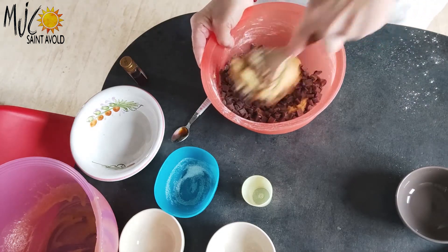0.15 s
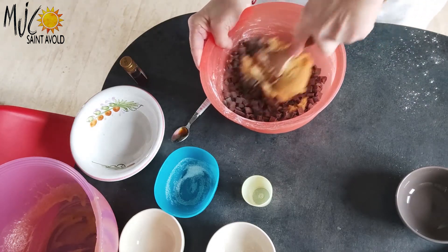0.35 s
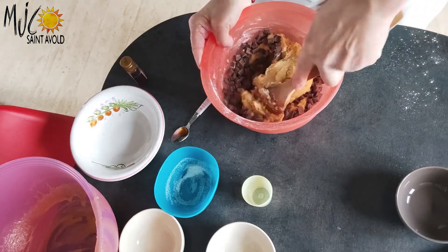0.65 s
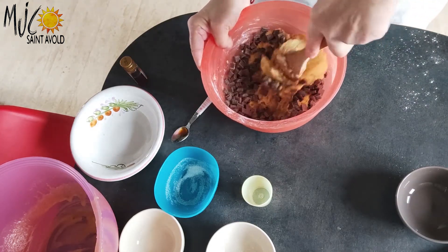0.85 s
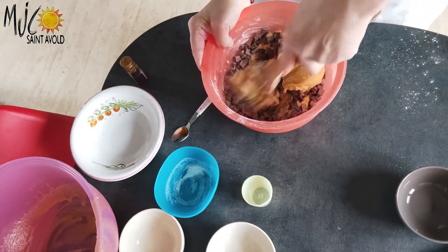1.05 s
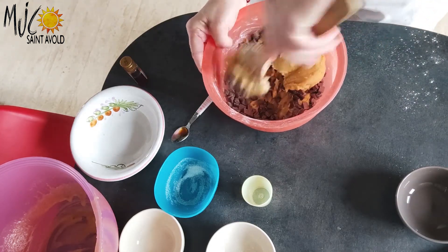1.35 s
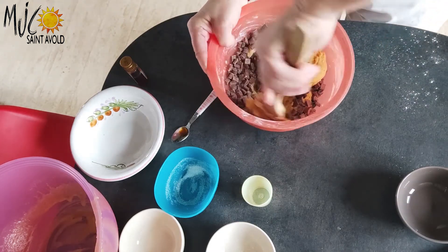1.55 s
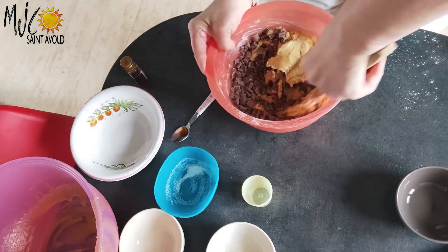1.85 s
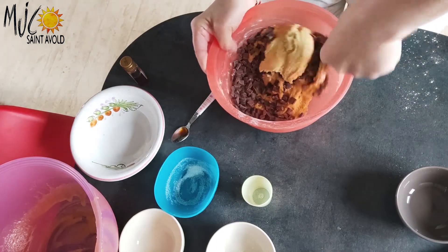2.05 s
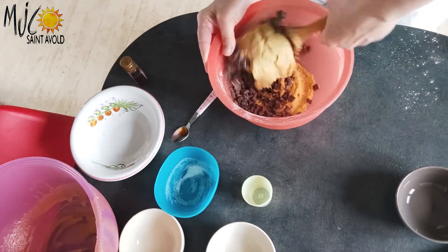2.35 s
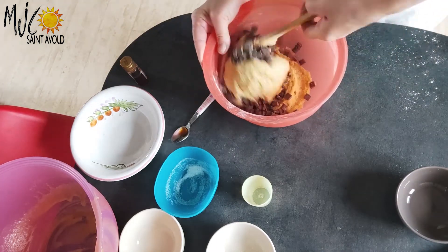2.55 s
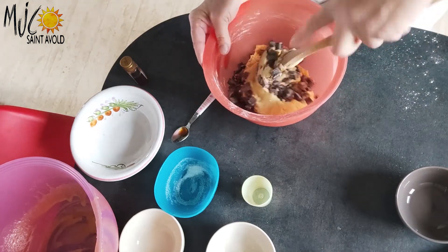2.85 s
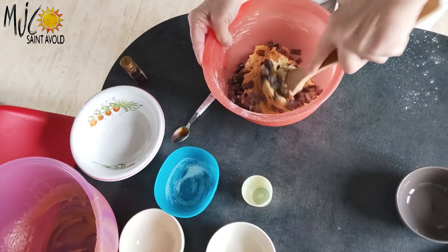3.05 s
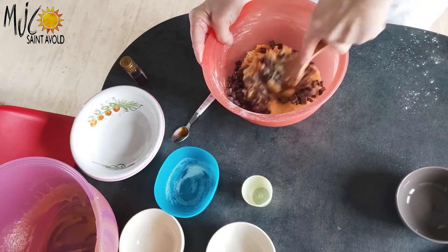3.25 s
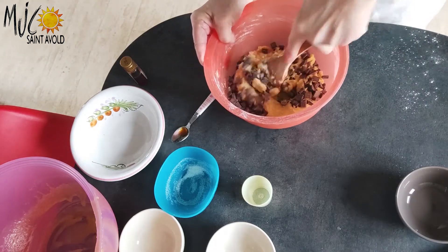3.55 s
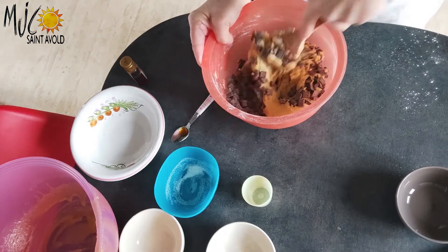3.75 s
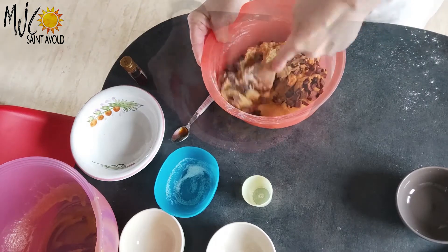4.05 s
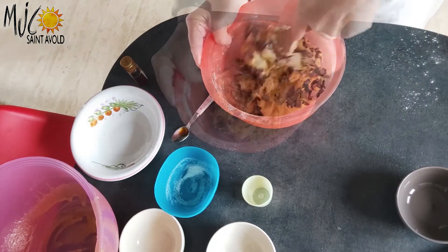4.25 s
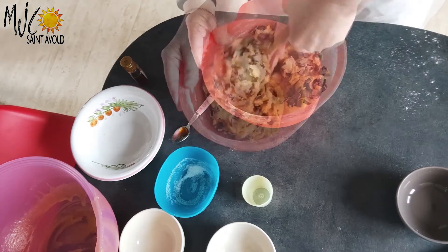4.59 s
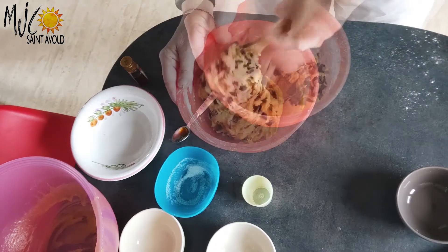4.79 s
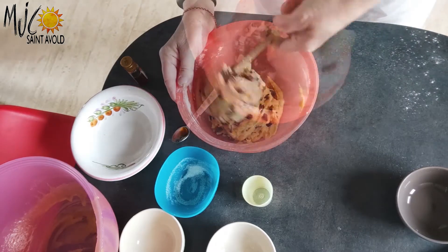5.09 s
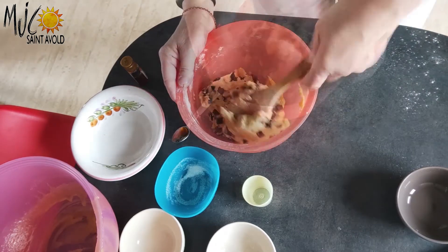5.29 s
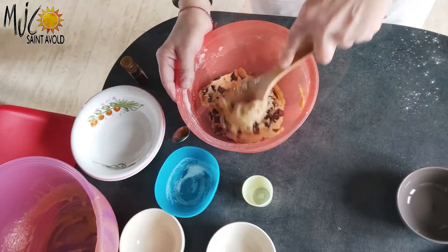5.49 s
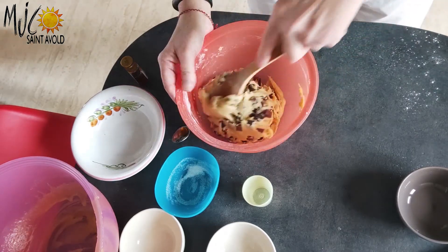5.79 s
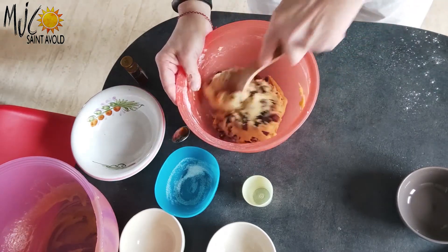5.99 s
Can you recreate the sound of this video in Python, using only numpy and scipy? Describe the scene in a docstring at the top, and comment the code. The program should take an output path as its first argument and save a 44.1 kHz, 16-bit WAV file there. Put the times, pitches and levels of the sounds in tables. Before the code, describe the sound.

A wooden spoon folds chocolate chips into thick dough in a plastic bowl, snapping, crunching and bumping, then abruptly turning to soft stirring.

```python
"""A small kitchen: a wooden spoon folds chocolate chips into thick dough in a hand-held plastic bowl.
Chips snap against the wall (noise bursts into short resonances), clumps crunch and wood judders on plastic;
the sticky mass grinds and smears (grains of noise) and the bowl bumps on the table (ringing modes).
After an abrupt edit the chips are bound in the dough and the stirring is soft.
Room echoes, still air and a low mains hum surround it, heard by two small microphones."""
import sys
import numpy as np
from scipy import signal
from scipy.fft import rfft, irfft
from scipy.io import wavfile

SR = 44100
rng = np.random.default_rng(int(sys.argv[2]) if len(sys.argv) > 2 else 0)


def file_out(sig):
    """Save sig as 16-bit WAV at sys.argv[1]."""
    # one column per channel
    cols = np.atleast_2d(sig).T
    # limit, then scale
    lim = np.clip(cols, -1, 1)
    pcm = np.round(lim * 32767).astype(np.int16)
    wavfile.write(sys.argv[1], SR, pcm)


N = 270288
TIME = np.arange(N) / SR

# Event levels are cue levels: each layer is trimmed again by the gains in scene().
# The loudest chips snapping on the wall, the pitch being that spot of the wall:
# (time [s], wall ring level [dB], bright crack level [dB], wall pitch [Hz])
SNAPS = [(0.0064, -27, -30, 2220), (0.057, -24.5, -23.5, 2650), (0.141, -29, -36.5, 2430),
         (0.203, -24.5, -30.5, 2250), (0.2994, -33.5, -29.5, 2180), (0.395, -37, -29, 2800),
         (0.4007, -24.5, -34, 3120), (0.43, -44, -28, 2200), (0.4751, -32, -24, 2480),
         (.496, -31.5, -24.5, 2170), (0.555, -33, -65, 2880), (0.6837, -18.5, -26.5, 2270),
         (0.7031, -26.5, -23.5, 2750), (0.8593, -42, -33, 2410), (1.1195, -35, -27.5, 2890),
         (1.126, -28, -19, 2870), (1.1366, -43, -20.5, 2840), (1.481, -22, -27.5, 2500),
         (1.4859, -40, -20, 2610), (1.691, -29, -35, 2640), (2.3097, -31, -56, 2480),
         (2.348, -32, -50.5, 2200), (2.3626, -25, -50, 2730), (2.405, -30.5, -27.5, 2060),
         (2.458, -23.5, -40, 2740), (2.505, -24.5, -51, 2400), (2.512, -27, -42, 2700),
         (2.5345, -28, -28, 2240), (2.5737, -17, -23.5, 2100), (2.6196, -37, -27, 2300),
         (2.633, -23, -26, 2350), (2.7039, -23, -27, 2420), (2.7235, -26.5, -31, 2550),
         (2.765, -25.5, -21.5, 2670), (2.9214, -21, -23, 2510), (2.9342, -30, -41.5, 2800),
         (2.9864, -25.5, -35, 2490), (3.004, -26, -30.5, 2450), (3.034, -27, -53, 2350),
         (3.089, -25.5, -61, 2470), (3.149, -30, -34.5, 2760), (3.175, -29, -39, 2410),
         (3.2201, -30, -30.5, 2510), (3.3517, -34, -49, 2140), (3.475, -23.5, -26, 2180),
         (3.817, -35, -42, 3060), (3.9924, -21, -38, 2220), (4.011, -32, -27, 2520),
         (4.0503, -34, -28.5, 2390), (4.233, -24, -30.5, 2150), (4.358, -29, -58, 2690),
         (4.4404, -25.5, -33.5, 1940), (4.476, -24.5, -16.5, 2760), (4.504, -27, -37, 2480),
         (4.5214, -28, -32, 2680), (4.549, -25, -34, 1930), (4.581, -30.5, -37, 2450),
         (4.455, -35, -48, 2100), (4.633, -23, -30, 2700), (4.6924, -28, -24.5, 2220),
         (4.7151, -24, -30.5, 2760), (4.868, -62, -38.5, 3430), (5.72, -69, -50.5, 3400)]
# A clump of chips and crumbs gives way under the spoon: (time [s], level [dB], fall to 1/e [s])
CRUNCHES = [(.008, -48, 0.08), (.194, -40.5, .012), (.402, -46, 0.026), (0.684, -34, 0.021),
            (1.125, -31.5, 0.015), (1.4838, -30.5, 0.0074), (2.4051, -41, 0.023), (2.449, -46.5, 0.022),
            (2.919, -48, 0.016), (3.74, -39.5, 0.016), (3.991, -27.5, 0.011), (4.054, -38, 0.02),
            (4.225, -35.5, 0.016), (4.469, -33.5, 0.03)]
# The spoon judders along the wall, which sings at the pitch of that spot:
# (time [s], level [dB], wall pitch [Hz], length [s])
JUDDERS = [(0.008, -34, 2440, 0.019), (0.406, -40, 2380, 0.064), (1.69, -42.5, 2830, 0.029),
           (1.768, -41, 2430, 0.031), (1.84, -39, 2530, 0.029), (1.901, -42, 1320, 0.0091),
           (1.932, -43.5, 1420, 0.053), (2.043, -44, 1350, 0.03), (2.356, -36, 2360, 0.027),
           (2.464, -34, 2500, 0.019), (2.934, -40, 2740, 0.023), (2.992, -29.5, 2290, 0.04),
           (3.088, -42, 2420, 0.022), (3.261, -38.5, 2320, 0.011), (4.634, -39.5, 2720, .015)]
# The bowl bumping on the table, edge and hollow ring relative to the thud:
# (time [s], thud level [dB], hard edge [dB], hollow ring [dB], contact swell [s])
BUMPS = [(0.284, -39.5, -12, 4, 0.026), (0.329, -40.5, -37, 7.5, 0.0077), (0.702, -38.5, -34, 5.5, 0.01),
         (1.129, -45.5, -3.5, 5.5, 0.015), (1.483, -49, -2, -8.5, 0.0054), (1.949, -48, -15, 5.5, 0.011),
         (2.435, -41, -30, 5, 0.0064), (3.4267, -24, -13, 6.5, 0.00438), (3.599, -45, -8, 0, 0.016),
         (3.848, -41.5, -19, 2, 0.015), (4.056, -46.5, -18, 7.5, 0.023), (4.3408, -30.5, -19, 7.5, 0.005),
         (4.478, -44.5, 12, -10, 0.0013), (4.53, -43, -10, 4, 0.0089), (4.797, -47, -30, 5, 0.013),
         (5.848, -51.5, -31, 0, 0.002)]
# Pushes of the spoon, length counted from the start to where the push begins to relax:
# (start [s], rise [s], length [s], load on the bowl [dB], chips grinding [dB], sticky smear [dB])
PUSHES = [(-0.03, 0.026, 0.028, -40.5, -32.5, -28.5), (0.248, 0.025, 0.13, -52, -47, -39),
          (0.388, 0.05, 0.093, -48.5, -43, -39), (0.575, 0.024, 0.038, -51, -74, -40.5),
          (0.67, 0.019, 0.22, -49, -52.5, -46), (1.078, 0.0083, 0.21, -62, -52, -53.5),
          (1.276, 0.019, 0.27, -79, -90, -47.5), (1.502, 0.022, 0.2, -60, -50, -43),
          (1.628, 0.031, 0.19, -49.5, -44, -42), (1.853, 0.063, 0.31, -56.5, -49.5, -41),
          (2.139, 0.22, 0.36, -52.5, -46, -38.5), (2.65, 0.024, 0.18, -53, -56.5, -42.5),
          (2.944, 0.095, 0.15, -49, -53, -58), (3.116, 0.031, 0.32, -57, -54.5, -52),
          (3.502, 0.075, 0.079, -52, -40.5, -37.5), (3.69, 0.015, 0.14, -56.5, -60.5, -48.5),
          (3.968, 0.024, 0.29, -47.5, -47.5, -37), (4.452, 0.036, 0.16, -49, -45, -36.5),
          (4.704, 0.0045, 0.025, -45.5, -61, -53), (4.738, 0.04, 0.058, -54.5, -64.5, -60),
          (4.94, 0.024, 0.018, -61, -62.5, -38), (5.182, 0.093, 0.15, -66, -62, -43),
          (5.377, 0.02, 0.038, -61, -64, -47), (5.439, 0.013, 0.02, -70, -72, -44.5),
          (5.864, 0.1, 0.1, -58.5, -61.5, -54), (6.013, 0.044, .13, -64.5, -72, -48.5)]
# The spoon gliding on under the pushes, with loose and with bound chips:
# (load [dB], grinding [dB], smear [dB])
GLIDE_LOOSE, GLIDE_BOUND = (-61.5, -69, -55), (-76.5, -92, -59)

# Ringing modes of bowl and table: (frequency [Hz], level [dB], 60 dB decay [s])
BOWL_MODES = [(71, -15, .2), (120, -21, .13), (163, -12, .12), (210, -4, .075), (232, 1.5, .115),
              (323, -3, .1), (361, -2, .105), (415, -3.5, .07), (450, -3.5, .08), (482, -5, .08),
              (632, 1.5, .06), (664, -1, .05), (790, -2.5, .05), (964, -13, .04)]
# Spectra, each a shape whose overall level is normalised: (frequency [Hz], density [dB per Hz])
WALL = [(150, -40), (600, -16), (1100, 2.5), (1500, -10.5), (2000, 1.5), (2450, 4.5), (3000, -2.5),
        (4000, -4), (8000, -17.5)]  # plastic wall when knocked
CRACK = [(200, -6), (1000, -3), (2500, -3.5), (4000, 3.5), (6000, 5.5), (9000, 4.5), (11000, 11),
         (16000, -12)]  # bright snap of a chip
CRUMBS = [(200, -6.5), (1000, 8), (1600, 6), (2400, 10.5), (4000, -0.5), (9000, -11), (11000, 2.5),
          (16000, -12)]  # breaking crumbs
GRIND = [(150, -20.5), (500, -6), (1000, -7), (1500, -8.5), (2300, -2.5), (2900, -2), (4000, -8.5),
         (6000, -7), (12000, -28.5)]  # rasp of chips grinding
SMEAR = [(300, -8.5), (1500, -37), (3500, -11.5), (6000, -6.5), (9000, -1), (12000, 7.5), (16000, -0.5)]  # sticky dough tearing
THUD = [(40, -7), (90, -12), (200, 4), (350, 4), (550, 6), (750, 8), (1000, -7.5), (2000, -20), (6000, -72)]  # thud of the bowl, also the heave of the mass
EDGE = [(100, -22), (600, -0.5), (1000, 4), (1300, 5.5), (1700, -7.5), (3500, -23), (9000, -29)]  # woody edge of a bump
CUSHION = [(100, 1), (230, -1.5), (400, -13.5), (800, -4), (1500, -1)]  # the dough softens the spoon's push on the bowl
AIR = [(20, -9), (70, 10), (120, 5), (220, 7), (450, 1.5), (800, -2.5), (1600, -14), (4000, -16.5),
       (8000, -49), (16000, -6)]  # still room air
# Small microphones, each with the resonance of its port: (frequency [Hz], gain [dB])
LEFT_MIC = [(100, -1.5), (800, -5), (1500, -0.5), (4000, -0.5), (6800, 0), (7700, 7), (8500, 9.5),
            (9200, 5), (9900, -22), (11000, -23), (16000, -28.5)]
RIGHT_MIC = [(100, -7), (800, -9), (1500, -1), (4000, 0.5), (6200, 4.5), (7300, 16), (8100, 6.5),
             (9200, -5), (9900, -10.5), (11000, -27.5), (16000, -18)]
# The kitchen's reverberation: (frequency [Hz], 60 dB decay [s], left-right likeness [0 to 1])
ROOM = [(100, 0.45, 0.98), (393, 0.4, 0.9), (1030, 0.77, 0.05), (2430, 0.51, 0.18), (6600, 0.44, 0),
        (15400, 0.044, 0)]

EDIT_S = 4.733
EDIT_DUCK_DB = -16.5  # echoes still ringing at the edit drop by this much
STIRS_PER_S = 2.5  # the echoes circle with the spoon
PUSH_T60_S = 0.26  # the dough relaxes by 60 dB
REBOUND_S, REBOUND_LOSS_DB = 0.01, 14  # a snapped chip strikes again, its delay scattered around this
TICK_RANGE_DB = 19  # from the strongest to the weakest flick of a loose chip
SLIP_S, SLIP_SPREAD_DB = 0.0069, 4.5  # mean wait between a judder's slips, uneven strength
RING_WIDTH_HZ = 320  # bandwidth of one resonance of the wall
AIR_DB, HUM_DB, HUM_HZ = -60, -63.5, 49.5  # levels ahead of the microphones
CUTOFF_HZ = 15600


def from_db(db):
    """Decibels to gain."""
    return 10 ** (np.asarray(db) / 20)


def rms_one(x):
    """Scale to rms 1."""
    return x / np.sqrt(np.mean(x ** 2) + 1e-20)


def at_hz(points, hz, axis=1):
    """Read one column of a table on a log-frequency axis."""
    points = np.array(points)
    return np.interp(np.log(np.maximum(hz, 1)), np.log(points[:, 0]), points[:, axis])


def coloured(x, spectrum, keep_power=True):
    """Causal (minimum-phase) filter with the given spectrum, made by folding its cepstrum."""
    size = 4096
    cepstrum = irfft(np.log(from_db(at_hz(spectrum, np.fft.rfftfreq(size, 1 / SR)))))
    cepstrum[1:size // 2] *= 2
    cepstrum[size // 2 + 1:] = 0
    response = irfft(np.exp(rfft(cepstrum)))
    if keep_power:
        response = response / np.linalg.norm(response)
    return signal.fftconvolve(x, response)[:N]


def drift(rate_hz):
    """Slow random wander with spread 1: noise through two equal low-passes."""
    r = np.exp(-2 * np.pi * rate_hz / SR)
    noise = rng.standard_normal(N + SR)
    settled = signal.lfilter([1], [1, -2 * r, r * r], noise)[SR:]
    return rms_one(settled)


def contacts(times, levels_db, lengths):
    """Each contact is a rough burst of force, even across pitch, that swells for its length and dies away."""
    out = np.zeros(N)
    t = TIME[:8192]
    grits = rng.standard_normal((len(times), len(t)))
    for s, db, length, grit in zip(times, levels_db, lengths, grits):
        age = t / max(length, 1e-4)
        swell = age * np.exp(1 - age)
        # keep only the phases, so that every pitch is equally strong
        even = irfft(np.exp(1j * np.angle(rfft(grit * swell))))
        burst = even * np.minimum(4 * swell, 1)
        gain = from_db(db) * np.linalg.norm(swell) / np.linalg.norm(burst)
        at = max(round(s * SR), 0)
        out[at:at + len(t)] += gain * burst[:N - at]
    return out


def grains(per_s, spread_db, rub_db):
    """Tiny ruptures of uneven size, in clumps, over smooth rubbing; rms 1."""
    born = rng.random(N) < per_s * from_db(4 * drift(25)) / SR
    sizes = from_db(spread_db * np.minimum(rng.exponential(1, N), 4))
    ruptures = born * sizes * rng.choice([-1, 1], N)
    return rms_one(rms_one(ruptures) + from_db(rub_db) * rng.standard_normal(N))


def wall_ring(force, hz):
    """One short resonance of the plastic wall; a click keeps its energy."""
    r = np.exp(-np.pi * RING_WIDTH_HZ / SR)
    zeros = np.sqrt((1 - r * r) / 2) * np.array([1, 0, -1])
    poles = [1, -2 * r * np.cos(2 * np.pi * hz / SR), r * r]
    return signal.lfilter(zeros, poles, force + 1e-18)


def bowl_ring(force):
    """The low modes of the bowl on the table, decaying sines of alternating sign."""
    t = TIME[:SR // 2]
    response = np.zeros(len(t))
    for k, (hz, db, t60) in enumerate(BOWL_MODES):
        response += (-1) ** k * from_db(db - 60 * t / t60) * np.sin(2 * np.pi * hz * t)
    return signal.fftconvolve(force, response / np.linalg.norm(response))[:N]


def background():
    """Still room air as coloured noise in each ear, and a low, slightly unsteady mains hum."""
    air = np.array([coloured(noise, AIR) for noise in rng.standard_normal((2, N))])
    hum_gain = from_db(HUM_DB + 1.0 * drift(2.3))
    hum = np.sqrt(2) * np.sin(2 * np.pi * HUM_HZ * TIME) * hum_gain
    return from_db(AIR_DB) * air + hum


def effort():
    """Load, grinding and smear as gains over time: each push rises, holds and relaxes over a light glide."""
    loose, bound = np.array(GLIDE_LOOSE)[:, None], np.array(GLIDE_BOUND)[:, None]
    power = from_db(np.where(TIME < EDIT_S, loose, bound)) ** 2
    for start, rise_s, length, *levels_db in PUSHES:
        # a push begun before the edit is cut off by it
        stop = EDIT_S if start + length / 2 < EDIT_S else N / SR
        span = slice(max(round(start * SR), 0), round(min(stop, start + 1) * SR))
        age = TIME[span] - start
        rise = np.sin(np.pi / 2 * np.clip(age / rise_s, 0, 1)) ** 2
        shape = rise * from_db(-60 * np.maximum(age - length, 0) / PUSH_T60_S)
        power[:, span] += np.outer(from_db(levels_db), shape) ** 2
    return np.sqrt(power)


def crumbling(count, low_hz, high_hz, patchy_db):
    """Separate chips grate on spots of the wall; each spot has its own pitch and comes and goes; rms 1."""
    clicks = grains(per_s=340, spread_db=3, rub_db=-30)
    spot = rng.integers(0, count, N)
    out = np.zeros(N)
    for k, hz in enumerate(np.geomspace(low_hz, high_hz, count)):
        out += wall_ring(clicks * (spot == k), hz) * from_db(patchy_db * drift(11.5))
    return rms_one(out)


def strokes(push, grind, smear, push_db, heave_db, grind_db, smear_db):
    """The moving spoon shakes the bowl, heaves the mass over, grinds the chips and tears the sticky dough."""
    shaking = grains(per_s=380, spread_db=7.0, rub_db=-7.0)
    rumble = from_db(push_db) * bowl_ring(coloured(shaking, CUSHION))
    heave = from_db(heave_db) * coloured(grains(per_s=330, spread_db=4, rub_db=-9.0), THUD)
    grating = crumbling(count=10, low_hz=1060, high_hz=5240, patchy_db=2) + rng.standard_normal(N)
    chips = from_db(grind_db) * grind * rms_one(coloured(grating, GRIND))
    tearing = grains(per_s=1500, spread_db=3.8, rub_db=-4)
    dough = from_db(smear_db) * smear * coloured(tearing, SMEAR)
    return push * (rumble + heave) + chips + dough


def snaps(ring_db, knock_db, crack_db, ring_s, crack_s):
    """A chip slips off the spoon: a sharp crack, a knock and a short wall ring, then a weaker rebound."""
    knock, ring, crack = np.zeros((3, N))
    loss = np.array([0, REBOUND_LOSS_DB])
    for s, wall_db, bright_db, hz in SNAPS:
        times = [s, s + REBOUND_S * rng.uniform(0.42, 1.3)]
        force = contacts(times, wall_db - loss, [ring_s] * 2)
        knock += force
        ring += wall_ring(force, hz)
        crack += contacts(times, bright_db - loss, [crack_s] * 2)
    knocking = from_db(knock_db) * coloured(knock, WALL)
    cracking = from_db(crack_db) * coloured(crack, CRACK)
    return from_db(ring_db) * ring + knocking + cracking


def crunches(level_db, ring_db):
    """A clump breaks at once and its crumbs settle in a dying crackle that rings the wall."""
    giving_way = np.zeros(N)
    for s, db, decay_s in CRUNCHES:
        at = round(s * SR)
        giving_way[at:] += from_db(db + level_db) * np.exp(-np.minimum(TIME[:N - at] / decay_s, 20))
    crumbs = coloured(giving_way * grains(per_s=1800, spread_db=5, rub_db=-21), CRUMBS)
    wall = coloured(giving_way * grains(per_s=710, spread_db=4.0, rub_db=-26), WALL)
    return crumbs + from_db(ring_db) * wall


def judders(level_db, fade_db, contact_s):
    """Wood sticks and slips on plastic: a fading run of separate slips, each ringing the wall."""
    out = np.zeros(N)
    for s, db, hz, length in JUDDERS:
        waits = SLIP_S * rng.uniform(.5, 1.5, 16)
        age = np.cumsum(waits) - waits[0]
        unevenness = SLIP_SPREAD_DB * rng.standard_normal(len(age))
        levels = db + level_db - fade_db * age / length + unevenness
        slipping = age < length
        force = contacts(s + age[slipping], levels[slipping], np.full(len(age), contact_s))
        out += wall_ring(force, hz)
    return out


def ticks(grind, smear, count, ring_db, crack_db, contact_s):
    """Small random snaps of loose chips: wall spots ring as hard as they grind, cracks follow the smear."""
    when, ring, crack = rng.random((count, 3)).T
    s, lengths = when * EDIT_S, np.full(count, contact_s)
    cracks = contacts(s, crack_db - TICK_RANGE_DB * crack, lengths)
    out = coloured(smear * cracks, CRACK)
    spots = rng.choice(np.array(SNAPS)[:, 3], size=6)
    for k, hz in enumerate(spots):
        here = slice(k, None, len(spots))
        flicks = contacts(s[here], ring_db - TICK_RANGE_DB * ring[here], lengths[here])
        out += wall_ring(grind * flicks, hz)
    return out


def bumps(body_db, thud_db, edge_db, edge_share, settle_share, settle_db):
    """A short woody edge blends into a dull thump of the bowl's modes, drawn out as the bowl settles."""
    s, db, edge, hollow, length = np.transpose(BUMPS)
    force = contacts(s, db + hollow + body_db, length)
    settling = contacts(s + length, db + hollow + settle_db, settle_share * length)
    body = bowl_ring(force + coloured(settling, CUSHION))
    thud = coloured(contacts(s, db + thud_db, length), THUD)
    woody_edge = coloured(contacts(s, db + edge + edge_db, edge_share * length), EDGE)
    return body + thud + woody_edge


def kitchen_response(build_s, early_db, early_s):
    """Diffuse tail by bands of noise: strong first reflections off table and crockery, then the walls."""
    t = TIME[:SR * 3 // 4]
    edges = np.geomspace(50, 17000, 10)
    out = 0
    for low, high in zip(edges, edges[1:]):
        band = signal.butter(2, [low, high], "band", fs=SR, output="sos")
        mid, side = signal.sosfilt(band, rng.standard_normal((2, len(t))))
        hz = np.sqrt(low * high)
        alike = np.clip(at_hz(ROOM, hz, axis=2), 0, 1)
        stereo = np.sqrt(1 + alike) * mid + np.sqrt(1 - alike) * side * [[1], [-1]]
        out = out + stereo * from_db(-60 * t / at_hz(ROOM, hz))
    build = 1 - np.exp(-(t / build_s) ** 2)
    early = 1 + from_db(early_db) * np.exp(-t / early_s)
    return rms_one(out * build * early) / np.sqrt(len(t))


def reflections(x, rooms):
    """Each place in the bowl has its own echoes as the spoon circles; the edit ducks those still ringing."""
    before = TIME < EDIT_S
    ducked = np.where(before, 1, from_db(EDIT_DUCK_DB))
    tail = 0
    for k, room in enumerate(rooms):
        # crossfade from one place to the next, once round per stir
        away = np.abs((STIRS_PER_S * TIME - k / len(rooms)) % 1 - .5) * len(rooms)
        share = np.sqrt(np.maximum(1 - away, 0))
        for part, gain in ((before, ducked), (~before, 1)):
            fed = (x * share * part)[None]
            tail = tail + signal.fftconvolve(fed, room, axes=1)[:, :N] * gain
    return tail


def in_kitchen(sources, wet_db, sway_db):
    """Direct sound, swaying between the microphones as hand and wall shade it, plus the room."""
    rooms = [kitchen_response(build_s=0.00037, early_db=-2.0, early_s=0.038) for _ in range(4)]
    sway = drift(22.4) * [[1], [-1]]
    direct = sum(x * from_db(db * sway) for x, db in zip(sources, sway_db))
    send = sum(from_db(db) * x for x, db in zip(sources, wet_db))
    return direct + reflections(send, rooms)


def scene():
    """Mix the chips, the bumping bowl and the stirring, set in the kitchen over its background."""
    push, grind, smear = effort()
    stirring = strokes(push, grind, smear, push_db=-10.5, heave_db=-5.0, grind_db=-4.5, smear_db=-6.5)
    chips = snaps(ring_db=-9.5, knock_db=-9, crack_db=-2.5, ring_s=0.00069, crack_s=0.00044)
    chips = chips + crunches(level_db=-2.5, ring_db=-5.5)
    chips = chips + judders(level_db=-2, fade_db=5, contact_s=0.0014)
    chips = chips + ticks(grind, smear, count=80, ring_db=13.5, crack_db=9.0, contact_s=0.00038)
    thuds = bumps(body_db=-2.5, thud_db=-1.5, edge_db=11.5, edge_share=0.35, settle_share=1.72, settle_db=-7.5)
    sources = (chips, thuds, stirring)
    return in_kitchen(sources, wet_db=(-1, -10.5, 1.0), sway_db=(2.2, .4, 1.3)) + background()


def record(dry):
    """Each microphone port adds its own treble peak; a steep low-pass cuts the top."""
    heard = np.array([coloured(x, mic, keep_power=False) for x, mic in zip(dry, (LEFT_MIC, RIGHT_MIC))])
    low_pass = signal.ellip(10, .1, 70, CUTOFF_HZ, fs=SR, output="sos")
    return signal.sosfilt(low_pass, heard)


dry = scene()
out = record(dry)
file_out(out)
```